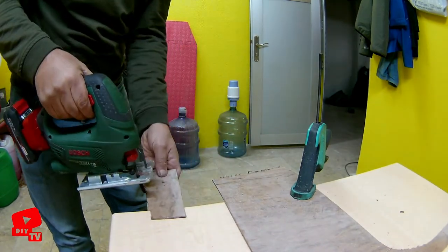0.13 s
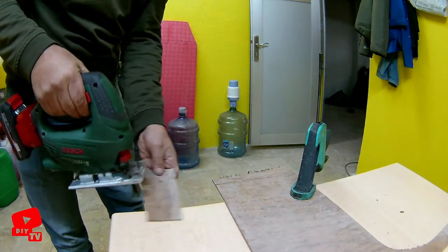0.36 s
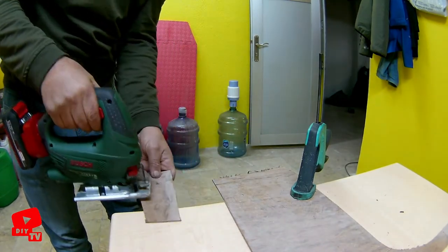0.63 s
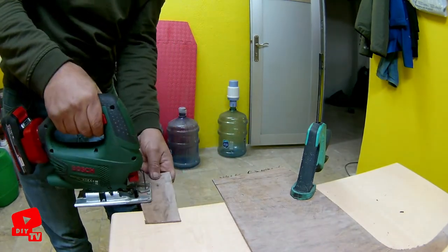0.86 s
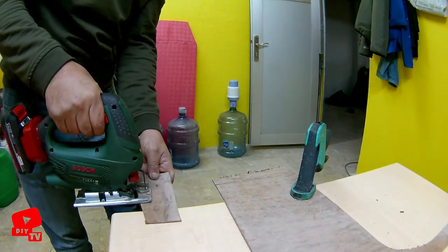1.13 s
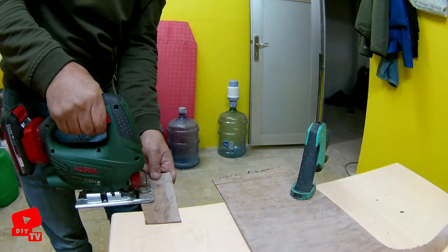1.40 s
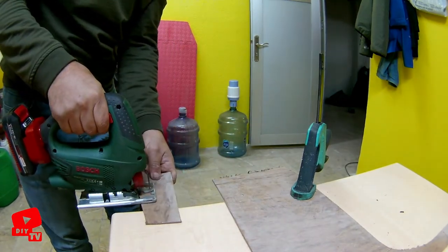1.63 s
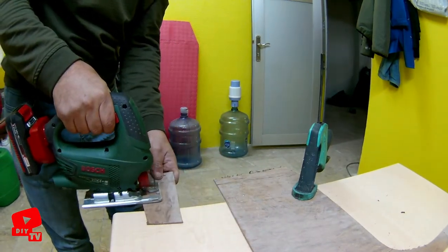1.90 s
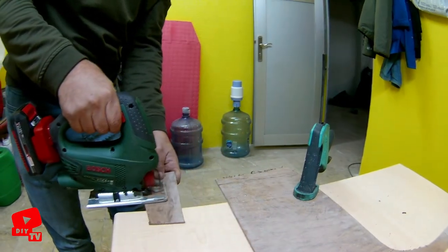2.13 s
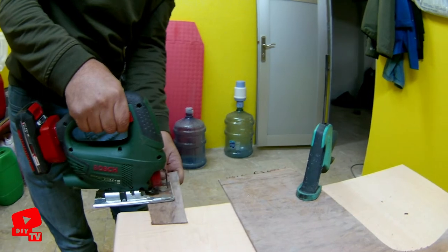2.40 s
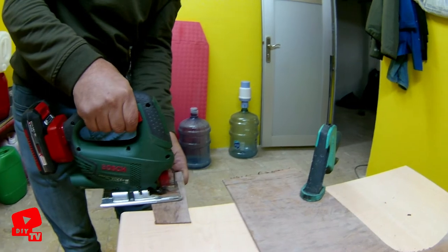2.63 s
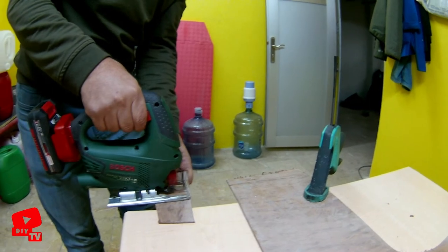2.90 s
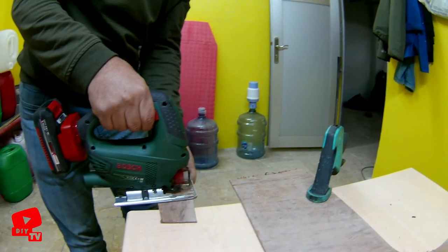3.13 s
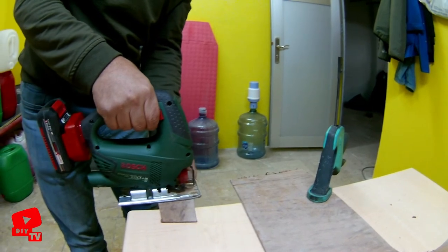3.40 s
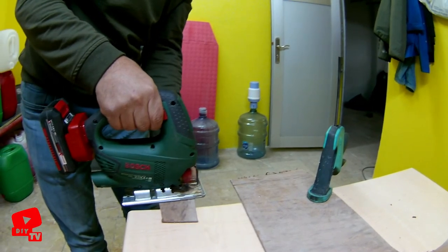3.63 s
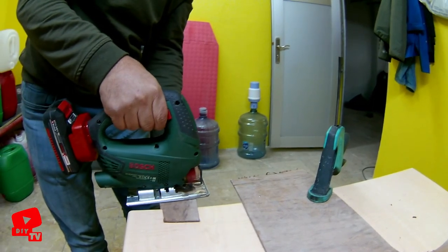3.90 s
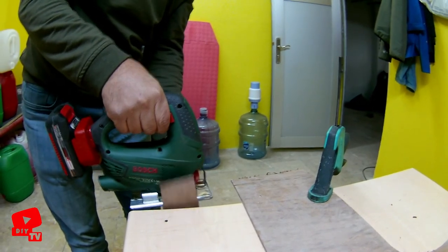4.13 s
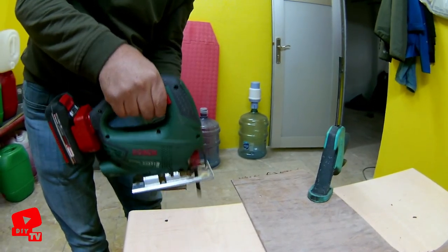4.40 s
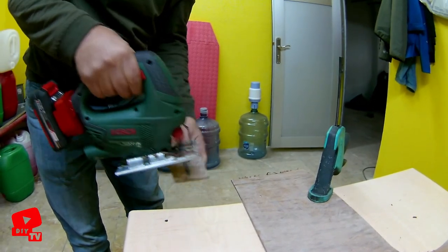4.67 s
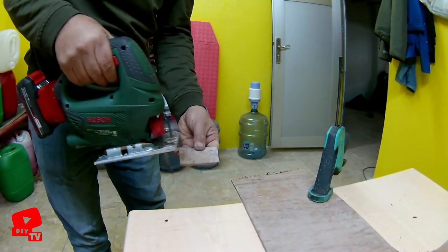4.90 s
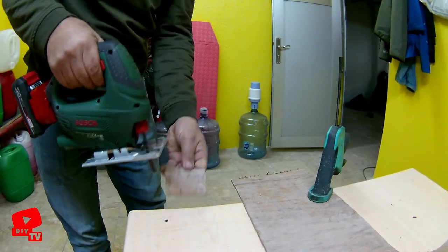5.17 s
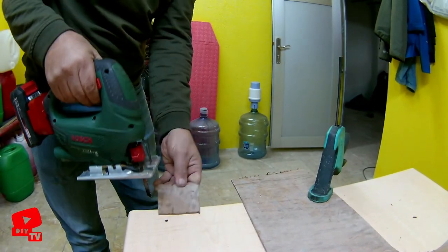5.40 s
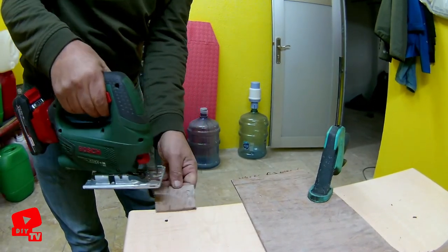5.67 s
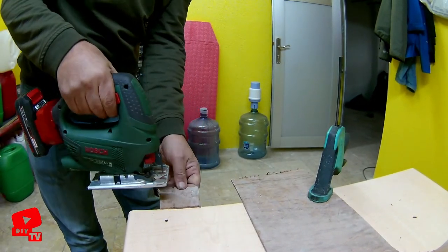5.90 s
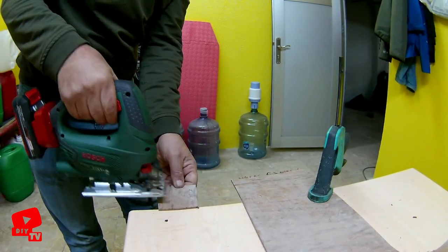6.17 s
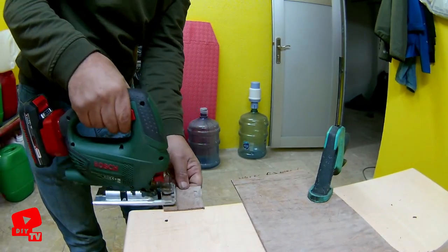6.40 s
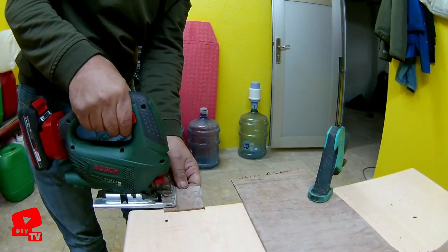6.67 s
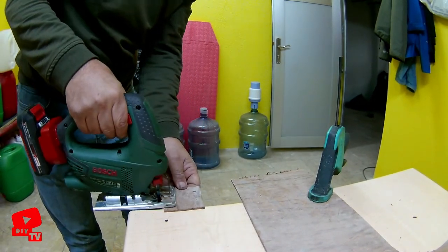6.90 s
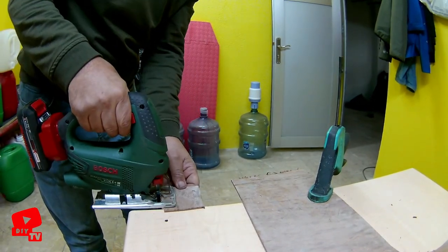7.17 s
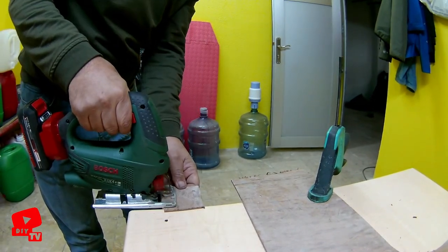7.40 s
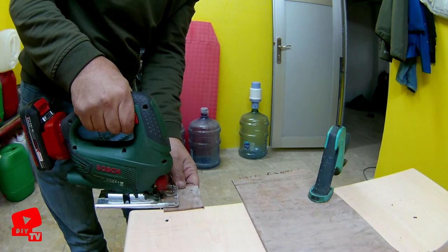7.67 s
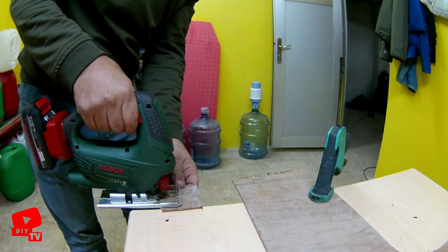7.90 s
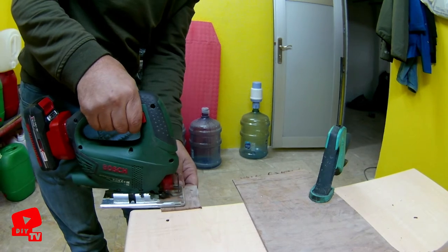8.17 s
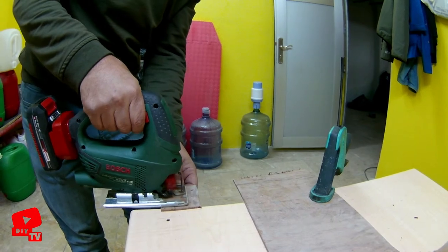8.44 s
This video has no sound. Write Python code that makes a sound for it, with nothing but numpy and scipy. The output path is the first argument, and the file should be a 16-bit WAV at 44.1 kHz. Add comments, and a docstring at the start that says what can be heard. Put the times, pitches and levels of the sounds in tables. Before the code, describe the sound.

Close microphone in a small, slightly reverberant workshop. After faint electrical buzzing and board knocks, a battery jigsaw bursts into a noisy gear whine, biting into wood with a buzzing rasp and low table thump. Jolts gather before the piece breaks off; the motor coasts to silence. Soft buzz, scraping and a cluster of wooden taps follow before the saw cuts again, abruptly ending at full speed.

```python
"""A soft knock and a faint, thin buzz ticking on and off over the hush of a workshop; then a jigsaw runs twice.
Gear whine (tones), grind and hiss (noise) follow a stroke count, and the load peaks as the blade turns.
Noise shaped by the board makes the rasp, low tones the thump. The blade breaks through, coasts to a stop and
starts again. Between the runs the board scrapes (grainy noise) and knocks (dying tones) on the table."""
import sys
import numpy as np
from scipy import signal
from scipy.fft import rfft, irfft, next_fast_len
from scipy.io import wavfile
from scipy.ndimage import uniform_filter1d

SR = 44100
rng = np.random.default_rng(int(sys.argv[2]) if len(sys.argv) > 2 else 0)


def pcm_store(signal):
    """Save signal as 16-bit PCM."""
    levels = np.round(np.clip(np.atleast_2d(signal), -1, 1) * 32767)
    wavfile.write(sys.argv[1], SR, levels.astype(np.int16).T)


def convert_level_to_amplitude(level_db):
    """Map a level in decibels to its linear amplitude factor."""
    exponent = np.asarray(level_db, float) / 20
    return 10 ** exponent


N = 377055
T = np.arange(N) / SR
SIZE = next_fast_len(N + SR, True)  # spare room keeps filter tails from wrapping round
HZ = np.fft.rfftfreq(SIZE, 1 / SR)


def noise():
    """White noise: every frequency equally strong."""
    return rng.standard_normal(N)


def evened(x):
    """Scales to rms 1."""
    return x / np.sqrt(np.mean(x ** 2) + 1e-20)


def steadied(x, samples):
    """Divides by the running rms, so the level stays near 1."""
    return x / np.sqrt(uniform_filter1d(x ** 2, samples) + 1e-9)


def coloured(x, points):
    """Filters by a spectrum drawn on a log-frequency axis."""
    hz, db = np.transpose(points)
    return irfft(rfft(x, SIZE) * convert_level_to_amplitude(np.interp(np.log(HZ + 1), np.log(hz), db)), SIZE)[:N]


def passed(x, kind, hz, order=4):
    """Keeps what lies above ("high") or below ("low") a frequency."""
    return signal.sosfilt(signal.butter(order, hz, kind, fs=SR, output="sos"), x)


def resonate(x, hz, width):
    """Shifts the curve hz down to zero, smooths, and shifts back: a resonance of gain 1."""
    turn = np.exp(2j * np.pi * np.cumsum(hz * np.ones(len(x))) / SR)
    r = np.exp(-np.pi * width / SR)
    return 2 * (turn * signal.lfilter([1 - r], [1, -r], x / turn)).real


def resonate_twice(x, hz, width):
    """Two equal resonances in a row give steeper sides."""
    return resonate(resonate(x, hz, width), hz, width)


def drift(seconds):
    """Slow chance of rms 1: noise averaged twice over this time."""
    length = int(seconds * SR)
    return evened(uniform_filter1d(uniform_filter1d(noise(), length), length))


def blotchy_noise(patchy_db, ms, hz):
    """Noise whose level differs at random from patch to patch of time (about ms) and frequency (about hz)."""
    z = signal.stft(noise(), nperseg=512, noverlap=384)[2]
    field = rng.standard_normal(z.shape)
    for _ in range(2):
        field = uniform_filter1d(field, 1 + int(hz / SR * 512), 0)
        field = uniform_filter1d(field, 1 + int(ms / 1000 * SR / 128), 1)
    return signal.istft(z * convert_level_to_amplitude(patchy_db * evened(field)), nperseg=512, noverlap=384)[1][:N]


def clicks(seconds, db):
    """One impulse at each time."""
    out = np.zeros(N)
    out[[round(s * SR) for s in seconds]] = convert_level_to_amplitude(db)
    return out


def burst(t60):
    """A short crack of noise, dying by 60 dB in t60 seconds."""
    t = np.arange(1500) / SR
    return .5 * rng.standard_normal(1500) * convert_level_to_amplitude(-60 * t / t60) * np.minimum(t / .0012, 1)


# The way from machine to microphone. Each row: frequency in Hz, gain in dB.
PATH_GAIN = [(300, -3.5), (1000, -5.5), (2500, 1), (4500, -3.5), (5800, -11), (6500, -18.5), (7500, -25),
             (8500, -34.5), (9500, -35.5), (10500, -29.5), (12000, -20), (15500, -14)]


def along_path(x):
    """The way to the microphone dulls some frequencies and favours others."""
    return coloured(x, PATH_GAIN)


# How the board sounds when shaken. Each row: frequency in Hz, gain in dB.
BOARD_GAIN = [(88, -43), (150, -16.5), (173, -13), (406, -2.5), (513, -8), (668, -1), (843, -2.5),
              (1310, -0.5), (1700, -2), (2210, -32), (3740, -120)]


def through_board(x):
    """The board passes on the frequencies it vibrates at."""
    return coloured(x, BOARD_GAIN)


# Resonances of the saw's housing. Each row: frequency in Hz, width in Hz, gain in dB.
HOUSING_MODES = [(1445, 30, 0.5), (2200, 78, -9.5), (2887, 73, -9), (3883, 390, 6.5), (4560, 40, -7.5)]


def add_housing(body):
    """The housing rings along at its own frequencies."""
    return body + sum(convert_level_to_amplitude(db) * resonate(body, hz, width) for hz, width, db in HOUSING_MODES)


# Spectrum of the room's hush. Each row: frequency in Hz, relative level in dB.
HUSH_SPECTRUM = [(20, -3.5), (100, -2), (170, -9.5), (290, -4), (390, -1.5), (450, -9), (560, -11),
                 (1000, -15), (2000, -19.5), (3200, -19), (5500, -25.5), (7500, -30.5), (10500, -34.5),
                 (13000, -30.5), (15800, -27)]


def room_hush():
    """Shaped noise whose level wavers a little around -65.5 dB."""
    return convert_level_to_amplitude(-65.5) * evened(coloured(noise(), HUSH_SPECTRUM)) * convert_level_to_amplitude(1.2 * drift(.02))


def workshop(x):
    """Sparse reflections of random sign, dying by 60 dB in 0.4 s; the bass is left out."""
    at = np.arange(200, 15000, 22)
    sign = rng.choice([-1., 1.], len(at))
    taps = np.zeros(15100)
    taps[at + rng.integers(0, 22, len(at))] = sign * convert_level_to_amplitude(-60 * at / SR / 0.4)
    return signal.oaconvolve(passed(x, "high", 300, 2), taps / np.linalg.norm(taps))[:N]


# Single bursts of the buzz. Each row: start in seconds, length in ms.
BUZZ_BURSTS = [(.136, 36), (.1925, 7.8), (.2227, 14), (.3571, 21), (.3856, 6.8), (.4325, 12.9), (.7914, 12),
               (.8066, 9.7), (.8234, 13), (.883, 6.3), (1.0182, 32), (1.081, 5.8)]
# The repeating buzz. Each row: start within the period in seconds, length in ms, slips to choose from in slots.
BUZZ_PAIRS = [(.023, 12.7, [0, 0, 0, 1, 2]), (.083, 6.3, [-1, 0, 0, 1])]
# Its tones. Each row: frequency in Hz, waver in Hz, relative level in dB.
BUZZ_TONES = [(3250, 210, 0), (6520, 190, -10), (12850, 130, -14)]


def buzz():
    """A wavering tone with two overtones, switched on and off sharply; later it repeats in a train."""
    slot_s = .01
    periods = np.arange(5.4, 7.3, .1)  # seconds
    train = [(s + at + slot_s * rng.choice(slips), ms) for at, ms, slips in BUZZ_PAIRS for s in periods]
    on = np.minimum(sum((T >= s) & (T < s + ms / 1000) for s, ms in BUZZ_BURSTS + train), 1.)
    tones = 0
    for hz, waver, db in BUZZ_TONES:
        tones = tones + convert_level_to_amplitude(db) * np.cos(2 * np.pi * np.cumsum(hz + waver * drift(.0006)) / SR)
    return convert_level_to_amplitude(-62) * uniform_filter1d(on, 40) * convert_level_to_amplitude(2.0 * drift(0.0017)) * tones


# The board dragged on the table. Each row: start in seconds, hold in seconds, relative level in dB,
# brightness in dB per band, fade in dB per second.
DRAGS = [(0.5, 0.066, -57, -5, 100), (0.564, 0.1, -44.5, -4, 154), (6.295, .24, -55, -11.5, 399.5)]
# Rumble of the table top: one relative level in dB for each drag.
DRAG_RUMBLE = [-61, -46.5, -51.5]


def scrapes():
    """Grainy wood on wood, and the table top rumbling along: it joins later and fades more slowly."""
    latest = np.maximum(np.searchsorted([row[0] for row in DRAGS], T) - 1, 0)
    start, hold, db, slope, fade = np.transpose(DRAGS)[:, latest]
    t = T - start
    drag = convert_level_to_amplitude(db - fade * np.maximum(t - hold, 0) + 2.84 * drift(0.016)) * np.clip(t / .008, 0, 1) ** 2
    grit = noise() * convert_level_to_amplitude(2.0 * drift(0.003))
    gains = [convert_level_to_amplitude(slope * k) for k in range(5)]
    bands = [evened(resonate_twice(grit, hz, hz)) for hz in (350, 700, 1400, 2800, 4500)]
    scrape = sum(g * band for g, band in zip(gains, bands)) / np.sqrt(sum(g ** 2 for g in gains))
    scrape += convert_level_to_amplitude(-10.5) * evened(resonate_twice(grit, 1120, 630))
    table = 0
    for row, rumble_db in zip(DRAGS, DRAG_RUMBLE):
        since = T - row[0]
        table = table + convert_level_to_amplitude(rumble_db - 55 * np.maximum(since - row[1], 0)) * np.clip(since / .06, 0, 1) ** 2
    rumble = evened(resonate_twice(noise(), 98, 58))
    return along_path(drag * scrape + table * rumble)


# Knocks of the board. Each row: time in seconds, relative level in dB, centre of the modes it rings in Hz,
# share of the free ringing time left by the hand.
KNOCKS = [(.057, -52, 2220, 0.1), (.539, -33.5, 502, 0.24), (.573, -31, 900, 0.12), (.643, -43, 1280, .2),
          (1.574, -21.5, 930, 1), (3.86, -24, 632, .9), (4.041, -28.5, 391, 0.99), (4.051, -27, 3030, .3),
          (4.08, -34, 190, .9), (4.109, -22.5, 1440, .9), (4.12, -34.5, 274, .9), (6.259, -49, 1800, .1),
          (6.303, -35.5, 763, 0.22), (6.338, -28.5, 650, 0.1), (6.361, -30.5, 692, 0.11),
          (6.379, -34, 1090, 0.33), (6.396, -33, 1160, 0.21), (6.436, -43, 920, .4),
          (6.471, -34.5, 1155, 0.28), (6.494, -32.5, 89, .5), (6.551, -41, 99, .9)]
# Modes of the board. Each row: frequency in Hz, time in seconds to die by 60 dB when ringing free.
PLANK_MODES = [(94, 0.103), (190, 0.22), (274, 0.25), (391, 0.13), (640, 0.079), (940, .06), (1180, 0.023),
               (1440, 0.12), (2210, 0.0531), (3030, .03)]


def knocks():
    """Each knock has its own level and rings the board's modes near its own centre."""
    out = np.zeros(N)
    t = np.arange(6000)[:, None] / SR
    modes, t60 = np.transpose(PLANK_MODES)
    for s, db, hz, left in KNOCKS:
        share = np.exp(-(np.log2(modes / hz) / 0.18) ** 2)  # spread in octaves
        rings = np.sin(2 * np.pi * modes * t) * convert_level_to_amplitude(-60 * t / (t60 * left)) * np.minimum(t * modes, 1)
        knock = rings @ (share / share.sum())
        knock[:1500] += hz / 3000 * burst(.012)  # knocks with a higher centre crack more
        out[round(s * SR):][:6000] += convert_level_to_amplitude(db + 7.5) * knock
    return along_path(out)


# When the motor drives. Each row: trigger pulled in seconds, let go in seconds.
TRIGGER_TIMES = [(1.202, 4.394), (7.31, 9)]
# Speed while the motor drives; the cut holds it back. Each row: time in seconds, blade strokes per second.
DRIVEN_SPEED = [(1.38, 34.9), (1.7, 34.8), (1.8, 34.56), (3.55, 34.59), (3.65, 34.9), (4.1, 35.0),
                (4.2, 35.8), (4.34, 35.4), (7.45, 34.6), (7.9, 34.58), (8.0, 34.5), (8.55, 34.52)]
# How hard the blade is fed into the board, one list a run. Each row: time in seconds, bite (1 is full).
FEED = [
    [(1.2, 0.2), (1.35, 0.24), (1.5, 0.68), (1.76, 1), (2.1, 0.89), (2.5, 1), (2.7, 0.93), (2.9, 1),
     (3.1, 1), (3.3, 0.94), (3.5, .9), (3.7, 0.78), (3.9, 0.84), (4.08, .9), (4.17, 0), (5.75, 0)],
    [(7.31, 0.03), (7.4, 0.57), (7.56, 0.83), (7.85, 0.96), (8.0, 1.01), (8.2, 1), (8.55, 0.98)],
]


def motion():
    """Time since the trigger, run number, stroke rate and bite: spin up, drive, coast against friction and fan."""
    run = (T >= TRIGGER_TIMES[1][0]).astype(int)
    pulled, let_go = np.transpose(TRIGGER_TIMES)[:, run]
    since = np.maximum(T - pulled, 1e-6)
    spin_up_s, jump = .16, 0.45  # time to full speed, share of it reached at once
    spin_up = 1 - (1 - jump) * np.clip(1 - since / spin_up_s, 0, 1) ** 2
    speed = np.interp(T, *np.transpose(DRIVEN_SPEED)) * spin_up
    # each second, coasting loses friction + fan_drag * speed ** 2 strokes per second
    friction, fan_drag = 17, .024
    scale, top = np.sqrt(friction / fan_drag), DRIVEN_SPEED[7][1]
    angle = np.arctan(top / scale) - np.sqrt(friction * fan_drag) * (T - let_go)
    speed = np.where(T > let_go, scale * np.tan(np.clip(angle, 1e-4, 1.5)), speed)
    bite = np.interp(T, *np.transpose(sum(FEED, [])))
    return since, run, speed, bite


# Blade catches. Each row: time in seconds, relative level of the jolt in dB.
CATCHES = [(1.6377, -8), (2.417, -22.5), (2.4745, -15), (3.024, -4.5), (3.0558, -4.5), (3.2837, -7),
           (3.3442, -3), (3.43, -13), (3.488, -6), (3.69, -6), (3.777, -14), (3.8316, 0), (3.891, -1.5),
           (3.9449, -7), (3.9748, -6), (4.0044, -4.5), (4.033, 2.5), (4.0793, 2.5), (4.1997, -5),
           (4.285, -10)]


def snags(bite):
    """A tooth catches: a swelling jolt rings the housing, a crack rings the board."""
    t = np.arange(800) / SR
    hz = HOUSING_MODES[3][0]
    ring = np.sin(2 * np.pi * hz * t) * (t / 0.0026) * np.exp(1 - t / 0.0011)
    ring += convert_level_to_amplitude(-11.5) * burst(0.0056)[:800]
    seconds, db = np.transpose(CATCHES)
    metal = signal.oaconvolve(clicks(seconds, db), ring)[:N]
    crack_db = -15 + 20 * bite  # weak with the blade free, strong at full bite
    wood = signal.oaconvolve(clicks(seconds, 0) * convert_level_to_amplitude(crack_db), burst(0.015))[:N]
    return convert_level_to_amplitude(3.5) * along_path(metal) + through_board(wood)


# A moment in each run, in seconds, when the blade turns.
BLADE_TURNS = [2.679, 8.0006]


def stroke_count(run, speed):
    """Adds up the stroke rate; whole numbers fall where the blade turns."""
    strokes = np.cumsum(speed) / SR
    first, second = np.interp(BLADE_TURNS, T, strokes)
    return strokes - np.where(run, second, first) + 400  # 400 keeps the count positive


# Load within one stroke. Each row: place in the stroke from 0 to 1, width as a share of the stroke,
# relative strength in dB.
LOAD_PEAKS = [(0, 0.05, 8), (.46, 0.032, 5.5), (.67, .03, 5.5)]


def stroke_load(strokes, slack):
    """Load peaks in dB, each with a strength of its own; they soften as the saw coasts."""
    force = rng.standard_normal((800, len(LOAD_PEAKS)))
    load_db = 0
    for k, (place, width, db) in enumerate(LOAD_PEAKS):
        near = np.round(strokes - place)
        strength = np.clip(1 + .28 * force[near.astype(int), k], 0, 1.5)
        load_db = load_db + db * strength * np.exp(-.5 * ((strokes - place - near) / width) ** 2)
    return load_db * (1 - 0.64 * slack)


# Pressure of the board on the table: dB added to the thump in each run.
BOARD_PRESSED = [2, 9]


def levels(since, run, speed, bite):
    """Level of each layer in dB: bite, break-out and speed set it, and it swells after the trigger."""
    break_s = 4.1  # the last fibres tear: a swell that peaks here
    tearing = np.exp(-abs(T - break_s) / np.where(T < break_s, 0.16, .03))
    # below 5.6 strokes per second the last turns murmur evenly
    halvings = np.log2(35 / np.maximum(speed, 5.6)) * (since > 1)

    def layer(free, fed, torn, slowed):
        """Running free, added at full bite, added at break-out, lost per halving of speed (all dB)."""
        return free + fed * bite + torn * tearing - slowed * halvings

    machine, rasp, thump = layer(-26, 4, 3, 11), layer(-44.5, 15.5, -2.5, 8.5), layer(-56, 10.5, 11, 17)
    hiss, whine = layer(-22.5, 4, 7, 0.5), layer(4, -2.5, -9.5, 3.5)  # hiss over machine, whine over grind
    rise = 60 * np.log10(1 - np.exp(-since / 0.022))
    rise = rise - 40 / (1 + (speed / 2.7) ** 16)  # silenced below 2.7 strokes per second
    warm_s = 0.4  # the motor starts softer and fills out
    thump = thump - 1.5 * np.exp(-(since / warm_s) ** 2)  # the table takes up the stroke late
    machine = machine - 4.5 * np.exp(-since / warm_s)
    machine = machine - 7 / (1 + (speed / 8.8) ** 12)  # slow gears stop clattering
    whine = whine - 9 * np.exp(-(since / 0.13) ** 4)  # buried until the gears mesh steadily
    whine = whine + 0.49 * drift(0.1)
    thump = thump + np.take(BOARD_PRESSED, run) + rise / 2
    return machine + rise, rasp + rise, thump, hiss + 1.5 * drift(.1), whine


# Gear lines. Each row: multiple of the stroke rate, relative level in dB.
GEAR_LINES = [(54, 0.5), (56, 1.5), (59, -4.5), (106, -9), (110, -7), (112, -6.5), (166, -6.5), (222, -2),
              (278, -9.5)]
# Loose teeth. Each row: multiple of the stroke rate, width in Hz, relative level in dB.
LOOSE_TEETH = [(57.4, 177, 4.5), (109.7, 290, -1.5), (163.4, 131, -1.5), (214.5, 270, -7)]


def gear_whine(strokes, speed, bite, slack, load_db):
    """Tones at multiples of the stroke, which blur and fade as coasting gears lose contact, over noisy rattle."""
    teeth = rattle = 0
    for k, db in GEAR_LINES:
        blur = (0.58 * k / 55 + 12 * slack) * drift(0.023)
        teeth = teeth + convert_level_to_amplitude(db + 1.0 * drift(0.02)) * np.cos(2 * np.pi * k * strokes + blur)
    for k, width, db in LOOSE_TEETH:
        tilt_db = 15.5 * slack * np.log2(k / 85)  # slowing shifts the rattle to the finer teeth
        rattle = rattle + convert_level_to_amplitude(db + tilt_db) * resonate(noise(), k * speed, width)
    contact_db = -50 * slack - 5 * (1 - np.minimum(bite, 1)) - 0.21 * load_db
    whine = evened(along_path(teeth)) * convert_level_to_amplitude(contact_db) + evened(along_path(rattle))
    return passed(whine, "high", 1550) * convert_level_to_amplitude(load_db)


def motor_grind(slack, load_db):
    """Brushes, bearings and fan: noise that swells with the load."""
    hum = blotchy_noise(3.2, 16, 100)  # the blotches are a texture of the sound, not the motor's doing
    return hum * convert_level_to_amplitude(.7 * load_db + (1.0 + 2.0 * slack) * drift(.003))


def machine_body(grind, whine, whine_db):
    """Grind and whine ring the housing; their sum is held at a steady level."""
    body = passed(passed(along_path(grind), "high", 1100, 2), "low", 9500)
    body = convert_level_to_amplitude(0.5) * evened(body) + convert_level_to_amplitude(whine_db) * evened(whine)
    return steadied(add_housing(body), 16000)


def air_hiss(grind):
    """Cooling air: the treble of the grind; one also hears its level waver at random."""
    return evened(passed(along_path(grind * convert_level_to_amplitude(2.3 * drift(0.022))), "high", 9500))


# The stroke heard through board and table; the first five rows thump, the rest rasp.
# Each row: multiple of the stroke rate, relative level in the first run in dB, in the second run in dB.
STROKE_LINES = [(1, -6, -19.5), (2, -7.5, .5), (3.026, -6.5, -2.5), (4.05, -13, -7), (4.99, -32, -3.5),
                (5.91, -6.5, 0.5), (7.08, -6, -25.5), (8.14, -2, -1), (10.04, -1, -19),
                (11.15, -5.5, -18.5), (12.17, -2.5, -1), (13.14, 0, -13), (15.1, -4, -3.5), (15.92, 1.5, 4),
                (17.18, 0, -14.5), (18.89, 5, 6), (19.85, -0.5, -8.5), (20.92, 1.5, 9.5), (25.2, -8, -5),
                (25.92, -0.5, -5), (32.1, -4.5, 0), (35.15, -10.5, -3.5), (38, 1, -6), (39.25, 1, -5.5)]


def stroke_tones(strokes, run):
    """Wavering tones near multiples of the stroke rate, sharing one small jitter."""
    jitter = 0.053 * drift(0.018)
    tones = []
    for k, first_db, second_db in STROKE_LINES:
        level = convert_level_to_amplitude(np.where(run, second_db, first_db) + 1.5 * drift(0.033) + 2.5 * drift(.25))
        tones.append(level * np.cos(k * (2 * np.pi * strokes - .3 + jitter) + 0.72 * drift(0.11)))
    return tones


def blade_rasp(tones, load_db):
    """The blade tears at the wood: noise through the board, with tones of the stroke."""
    tear = blotchy_noise(2.8, 25, 150)  # the blotches are a texture of the sound, not the wood's doing
    tear = through_board(tear * convert_level_to_amplitude(0.64 * load_db))
    return evened(tear) + convert_level_to_amplitude(-4) * evened(sum(tones))


def table_thump(tones, bite, slack):
    """Low tones of the stroke, stronger with the bite, over a noisy rumble."""
    rumble = coloured(noise(), [(20, -8.0), (60, 6.5), (220, -9.5), (330, -32.0)])
    held_db = -40 * slack - 9 * (1.5 - np.minimum(bite, 1))
    return steadied(sum(tones), 8000) * convert_level_to_amplitude(held_db) + convert_level_to_amplitude(-12.5) * evened(rumble)


def entry_slaps(strokes, since):
    """The blade enters the board's edge: a burst of noise each stroke, strongest 0.31 s after the trigger."""
    slap = through_board(noise() * np.exp(-((strokes + .03) % 1) / .1))
    slap = evened(resonate(slap, 870, 990))
    return convert_level_to_amplitude(-35) * slap * np.exp(-((since - 0.31) / 0.18) ** 2)


def jigsaw(since, run, speed, bite):
    """Everything that turns follows the stroke count; the load peaks where the blade reverses."""
    strokes = stroke_count(run, speed)
    machine_db, rasp_db, thump_db, hiss_db, whine_db = levels(since, run, speed, bite)
    slack = np.clip(1 - speed / 34.5, 0, 1)  # 0 at working speed, 1 at a standstill
    load_db = stroke_load(strokes, slack)
    grind = motor_grind(slack, load_db)
    whine = gear_whine(strokes, speed, bite, slack, load_db)
    machine = machine_body(grind, whine, whine_db) + convert_level_to_amplitude(hiss_db) * air_hiss(grind)
    tones = stroke_tones(strokes, run)
    rasp = convert_level_to_amplitude(rasp_db) * evened(blade_rasp(tones[5:], load_db))
    thump = convert_level_to_amplitude(thump_db) * evened(table_thump(tones[:5], bite, slack))
    board = (entry_slaps(strokes, since) + rasp + thump) * (T > TRIGGER_TIMES[0][0])
    return convert_level_to_amplitude(machine_db) * machine + board


def scene():
    """Saw and board with their room, the buzz, and the hush of the workshop."""
    since, run, speed, bite = motion()
    near = jigsaw(since, run, speed, bite) + snags(bite) + scrapes() + knocks()
    return (near + convert_level_to_amplitude(-6.5) * workshop(near) + buzz() + room_hush())[None]


# Narrow dips; the one near 3.45 kHz is a dip of the saw's housing. Each row: frequency in Hz, width in Hz,
# depth in dB.
NARROW_DIPS = [(1630, 44, -0.5), (3450, 58, -7), (5963, 202, -51), (6995, 240, -32), (7926, 254, -41),
               (9070, 320, -14), (9960, 430, -13)]


def microphone(dry):
    """Narrow dips in the sound, the one near 3.45 kHz from the saw's housing, and the sound stops steeply above
    15.7 kHz."""
    dips_db = sum(db / (1 + (2 * (HZ - hz) / width) ** 4) for hz, width, db in NARROW_DIPS)
    dips_db += np.interp(HZ, [15700, 15850], [0, -70])
    return irfft(rfft(dry, SIZE) * convert_level_to_amplitude(dips_db), SIZE)[:, :N]


def low_pass(x):
    """Removes everything above the highest recorded frequency."""
    return signal.sosfilt(signal.butter(12, 16140, fs=SR, output="sos"), x)


def record(dry):
    """The scene as the microphone picks it up."""
    mix = microphone(dry)
    return low_pass(mix)


dry = scene()
out = record(dry)
pcm_store(out)
```